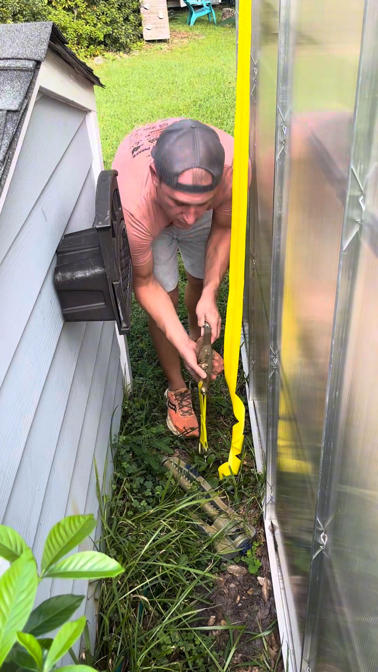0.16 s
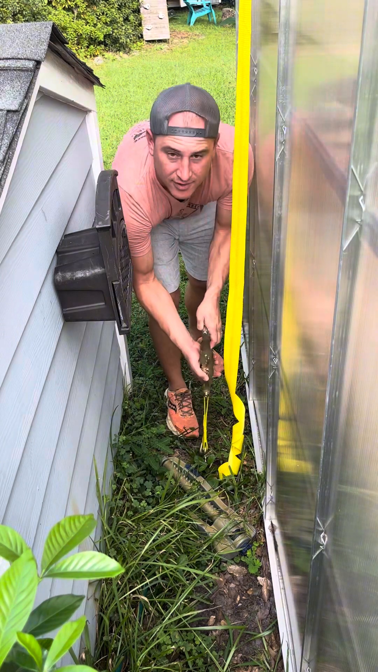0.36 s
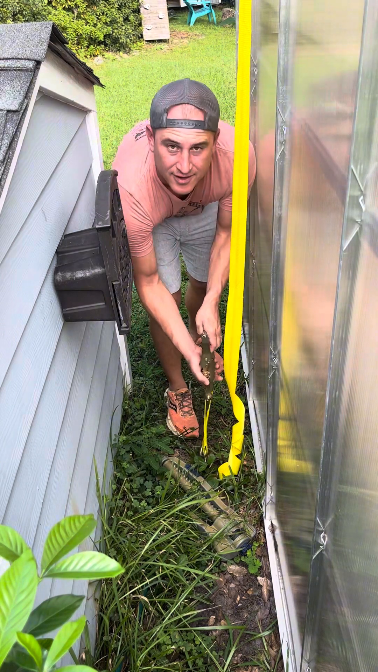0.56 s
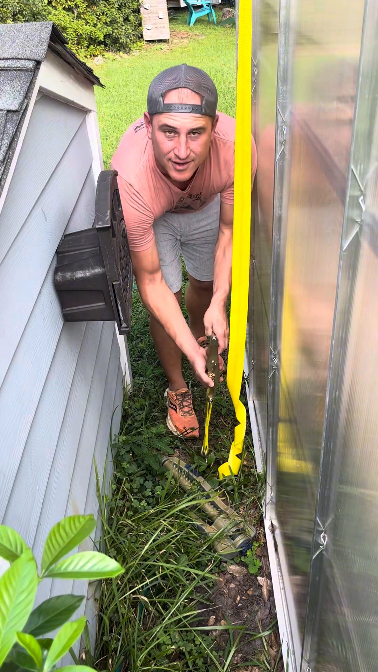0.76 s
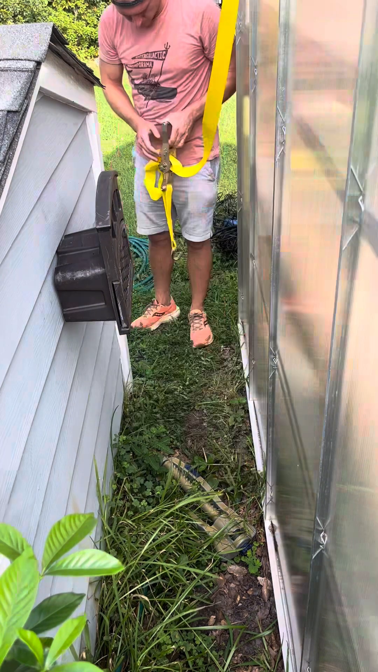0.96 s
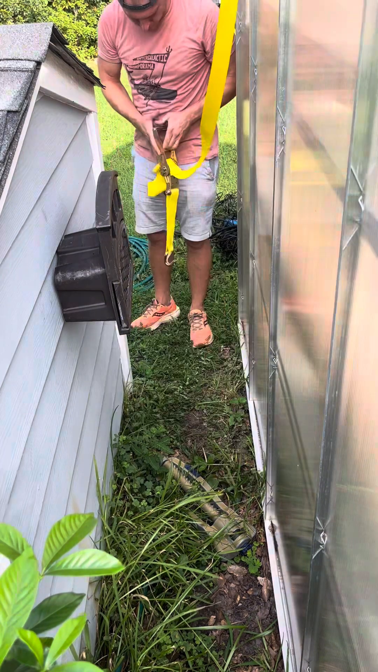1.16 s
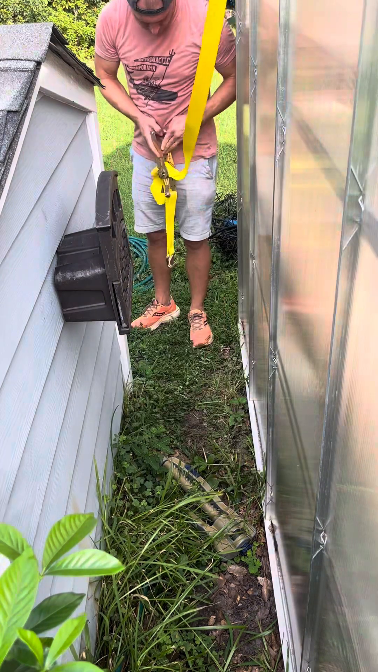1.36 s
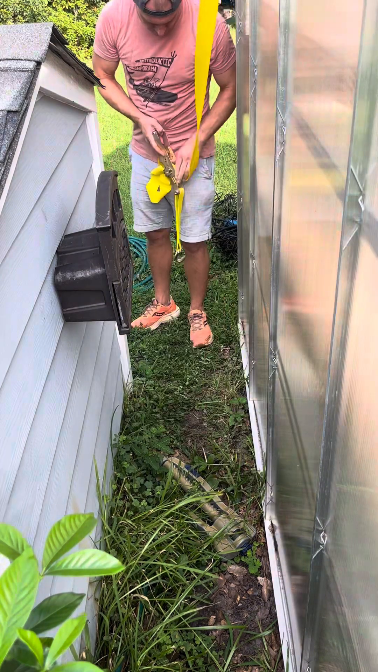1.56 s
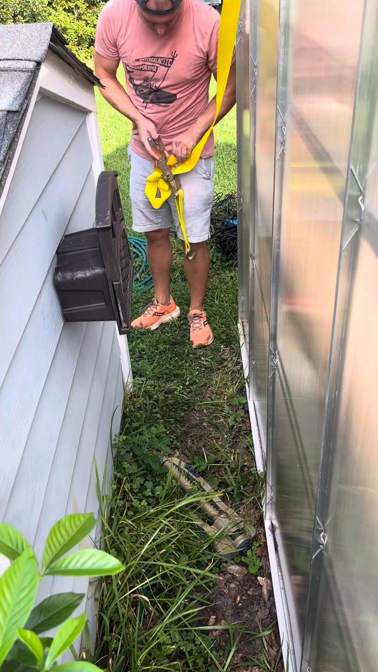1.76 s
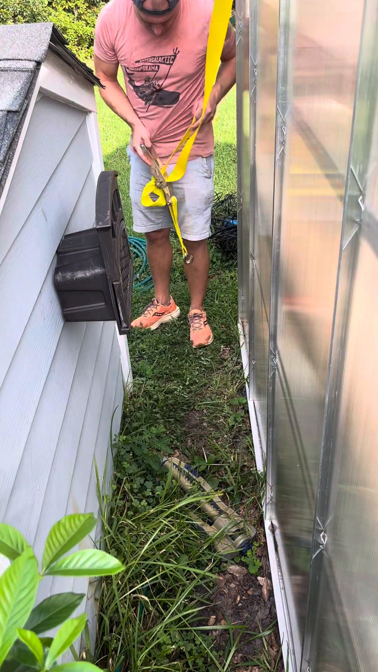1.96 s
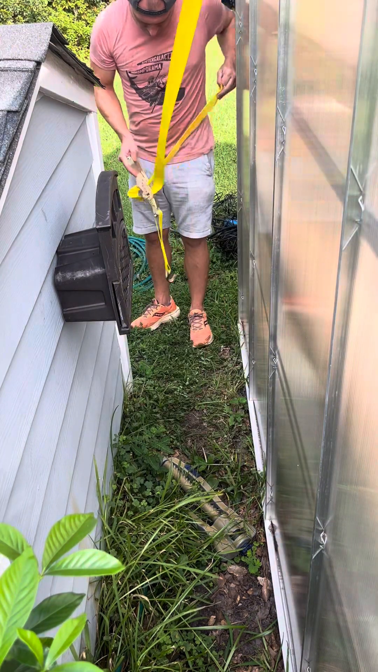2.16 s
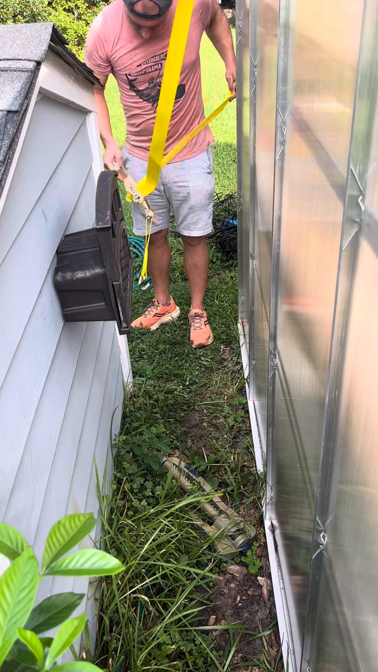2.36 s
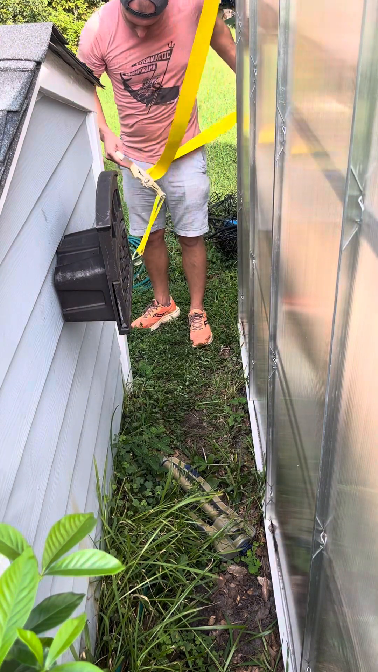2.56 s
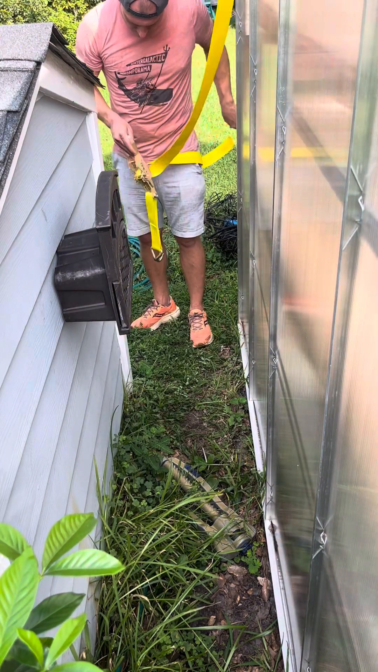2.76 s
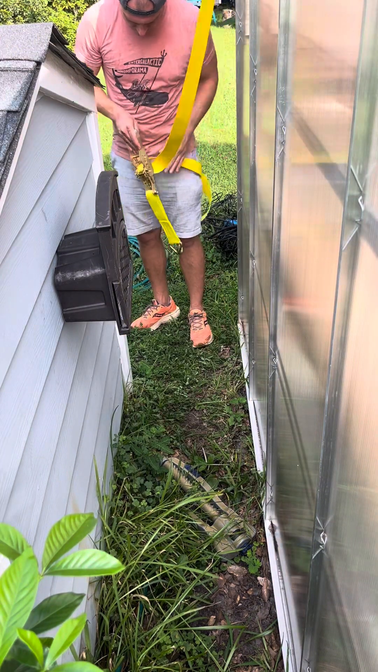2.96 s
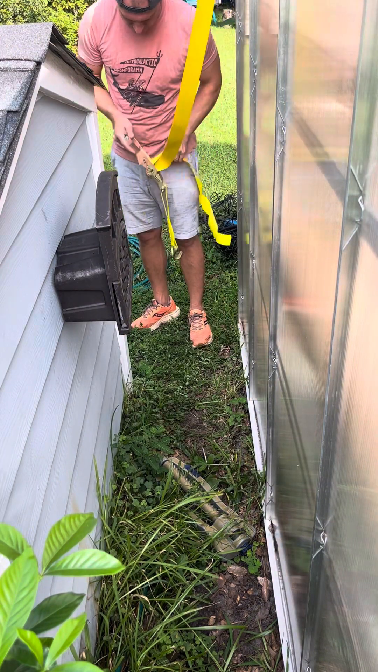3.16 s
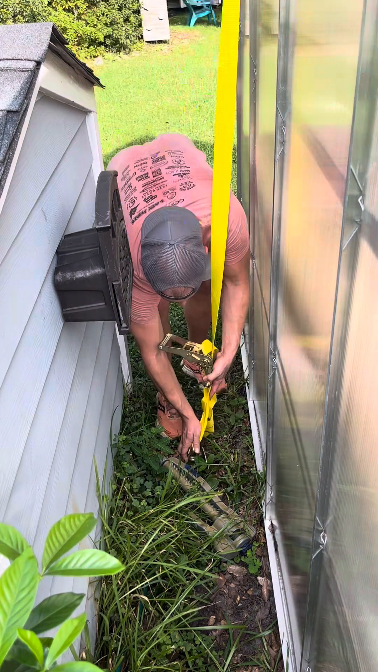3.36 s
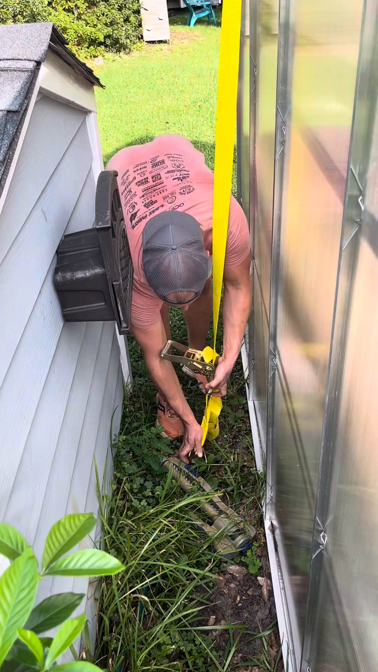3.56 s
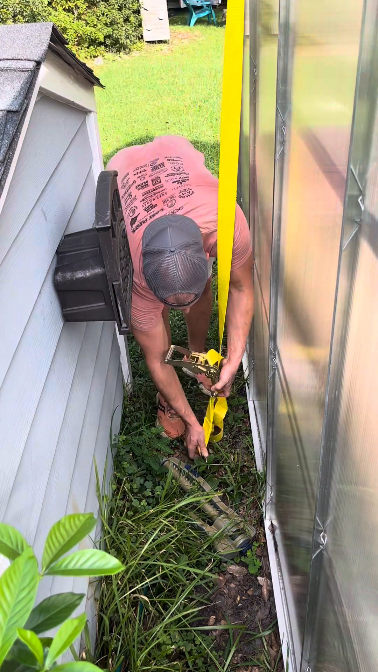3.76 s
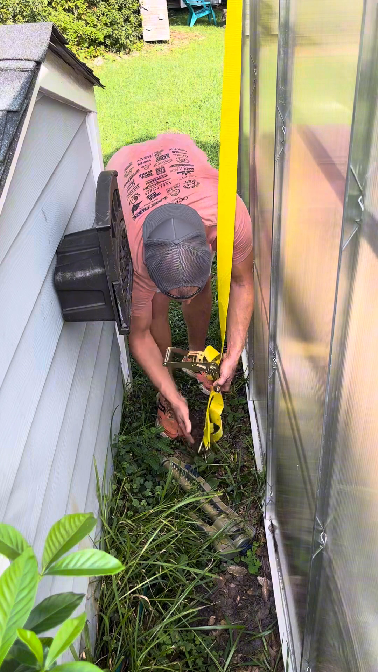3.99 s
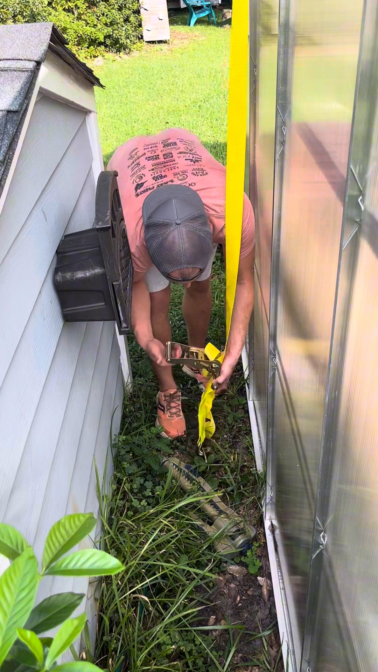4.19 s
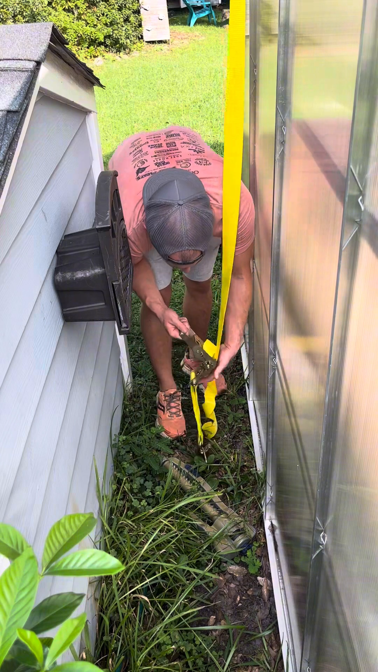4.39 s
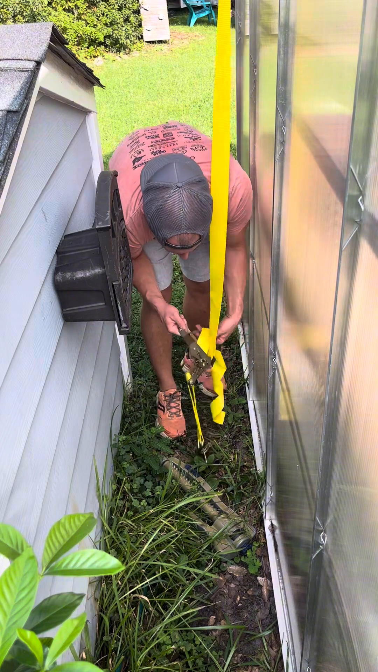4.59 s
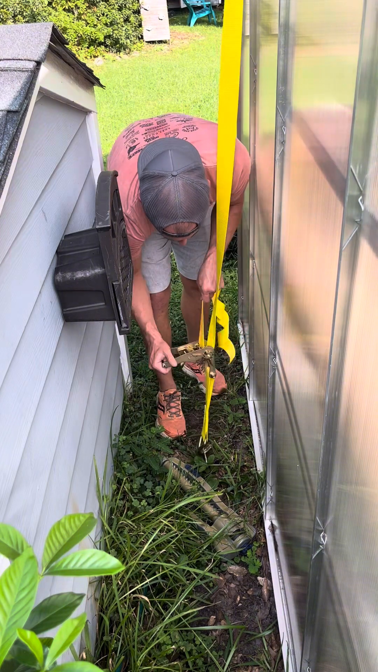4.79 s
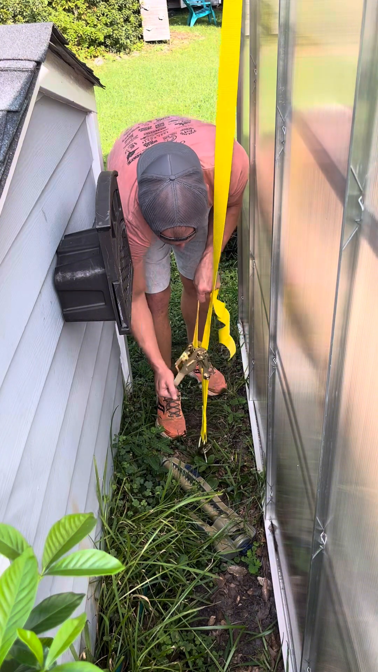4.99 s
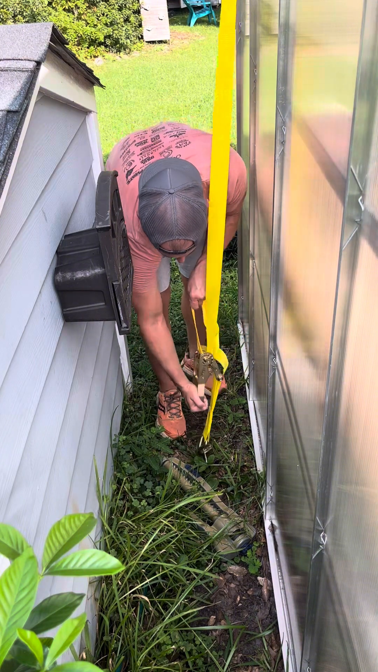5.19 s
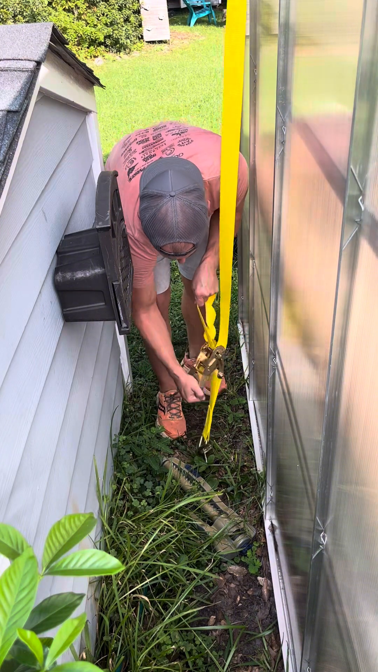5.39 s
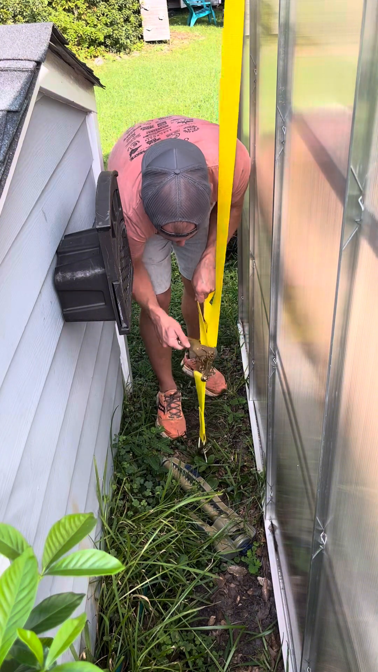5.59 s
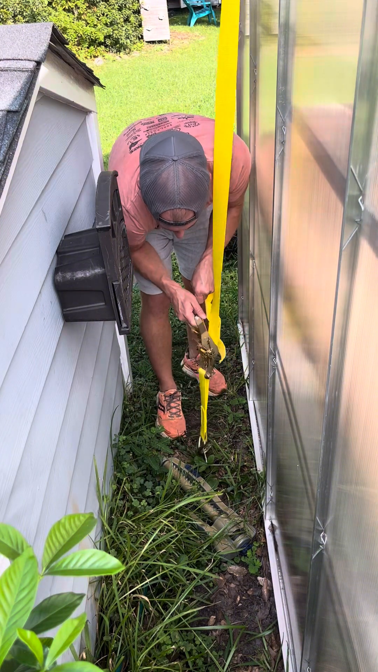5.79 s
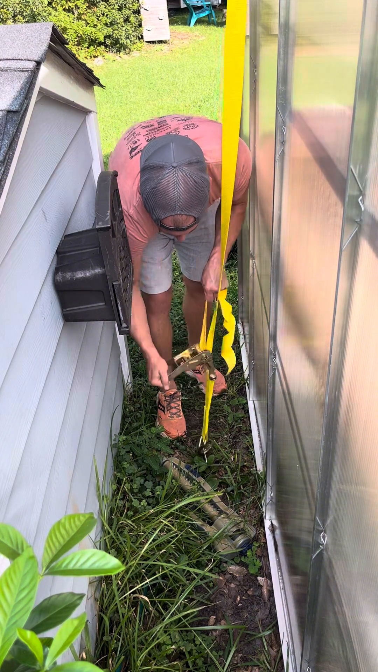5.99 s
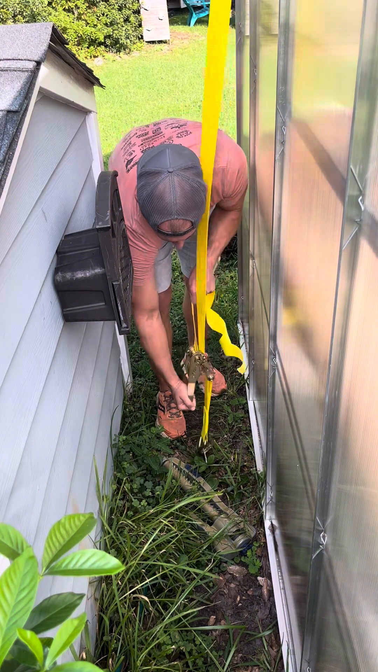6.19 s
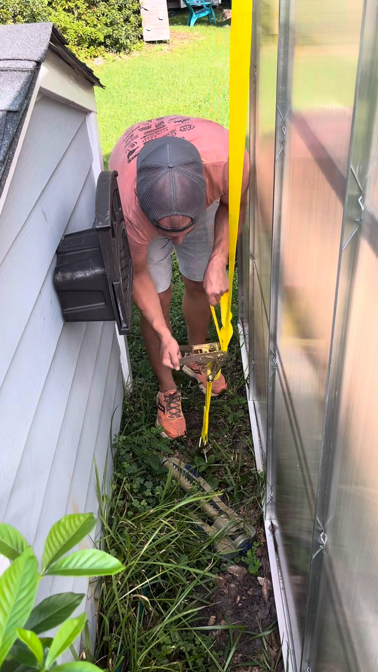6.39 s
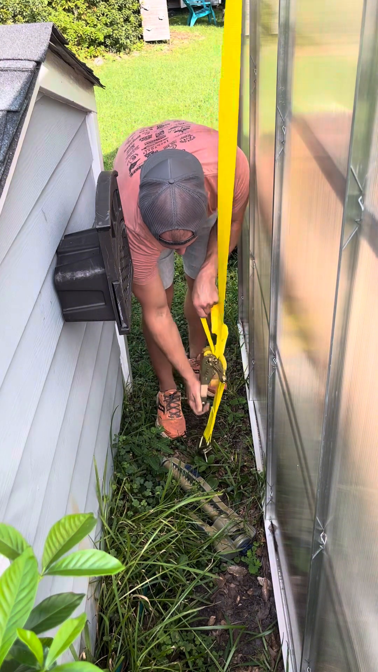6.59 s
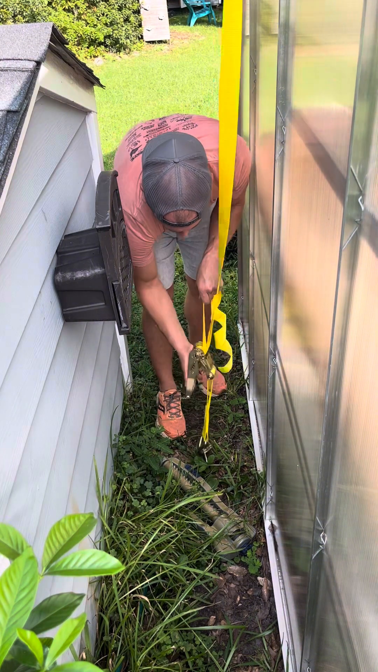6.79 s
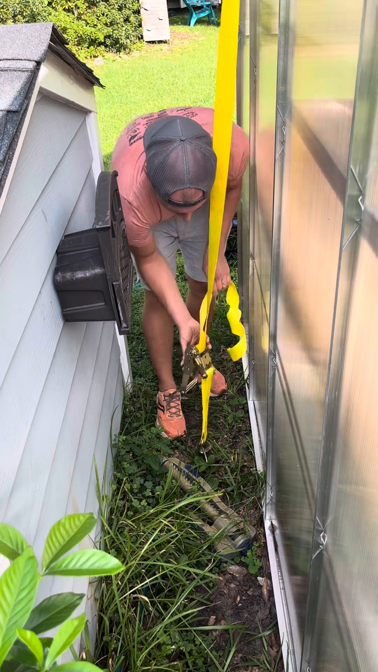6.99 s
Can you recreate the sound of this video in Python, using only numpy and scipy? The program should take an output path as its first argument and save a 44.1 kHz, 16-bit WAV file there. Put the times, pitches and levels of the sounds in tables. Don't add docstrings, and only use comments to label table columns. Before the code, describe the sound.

Outdoors in a tight passage, heard from about two metres. From 0 to 1 s a distant engine drones low, sinking in pitch and swelling, with a thin insect shimmer, small metal ticks and a clearer clink at 0.65; the engine stops dead at 0.98. A quiet bed remains: soft gusty rumble, distant traffic, faint high cricket trills and a barely audible hum. A sharp clink with a brush of webbing at 1.37, a dull rustling tap at 2.1, then near quiet. From 3.7 to 4.4 loose steel parts jingle brightly. Loud ratchet double clicks snap at 4.92 and 5.04, three rapidly at 5.53-5.66, three at 5.95-6.07, and two at 6.41 and 6.46, hard and bright with short rings and slap echoes. The last is abruptly cut; a faint falling squeak, rustle and small ticks at 6.8-6.95 close over low rumble.

```python
import sys
import numpy as np
from scipy import signal
from scipy.fft import rfft, irfft, next_fast_len
from scipy.io import wavfile
from scipy.ndimage import uniform_filter1d

SR = 44100
rng = np.random.default_rng(int(sys.argv[2]) if len(sys.argv) > 2 else 0)


def ratio_of_db(decibels):
    return 10 ** (np.asarray(decibels, float) / 20)


def wrap_up_sound(samples):
    columns = np.atleast_2d(samples).T
    tamed = np.clip(columns, -1, 1)
    steps = np.round(tamed * 32767).astype(np.int16)
    wavfile.write(sys.argv[1], SR, steps)


N = 310903
T = np.arange(N) / SR
FAST = next_fast_len(N)

CUTS_S = [
    .9825,
    4.766,
    6.4663,
]
# hz, density [dB per Hz]
AIR = [(25, -77), (40, -68), (60, -56.5), (100, -64), (150, -70), (250, -81), (500, -88), (800, -84),
       (1200, -89.5), (1800, -97), (3000, -103), (6000, -112), (10000, -117), (14000, -125)]


def set_rms(x, db):
    return x * ratio_of_db(db) / np.sqrt(np.mean(x ** 2))


def curves(table):
    s, *columns = np.transpose(table)
    return [np.interp(T, s, column) for column in columns]


def spectrum_db(table, hz):
    f, db = np.transpose(table)
    return np.interp(np.log(hz + 1), np.log(f), db)


def noise(table):
    hz = np.fft.rfftfreq(FAST, 1 / SR)
    white = rfft(rng.standard_normal(FAST))
    return irfft(white * ratio_of_db(spectrum_db(table, hz)), FAST)[:N] * np.sqrt(SR / 2)


def band(x, lo_hz, hi_hz):
    return signal.sosfilt(signal.butter(3, [lo_hz, hi_hz], "bandpass", fs=SR, output="sos"), x)


def walk(rate_hz):
    k = int(SR / rate_hz)
    held = np.repeat(rng.standard_normal(N // k + 1), k)
    return uniform_filter1d(uniform_filter1d(held, k), k)[:N]


def add(out, s, x):
    i = int(s * SR)
    end = min([int(c * SR) for c in CUTS_S if c > s] + [N, i + len(x)])
    out[i:end] += x[:end - i]


def engine():
    # start_s, firing_hz, level_db
    course = [(0.0, 81.5, -45), (0.046, 84.4, -52), (0.182, 80.3, -47), (0.234, 78.6, -43),
              (0.42, 76, -36.5), (0.774, 71.96, -34), (0.962, 72, -30), (0.98, 68.4, -30.5)]
    hz, firing_db = curves(course)
    phase = 2 * np.pi * np.cumsum(hz) / SR
    tone = np.zeros(N)
    for order, rel_db in [(1, 0), (1.5, -11.5), (2, -20.5)]:
        tone += np.sqrt(2) * ratio_of_db(firing_db + rel_db + 1.9 * walk(20)) * np.sin(order * phase)
    return tone * (T < CUTS_S[0])


def rumble():
    # start_s, gust_db
    gusts = [(1.0, -48), (1.64, -44.5), (1.79, -49.5), (2.28, -38), (2.43, -52.5), (2.53, -45.5),
             (4.69, -48.5), (4.72, -41.5), (4.76, -55), (5.09, -44), (5.5, -48), (5.7, -35.5),
             (5.97, -50.5), (6.07, -42), (7.0, -49.5), (7.05, -44.5)]
    # low_hz, high_hz, mean_db, share of gust followed [0-1], own_wander_db
    lows = [
        (20, 106, -45.5, 1.0, .5),
        (107, 187.6, -50.5, .35, 2.5),
        (200, 411, -56, 0.25, 1.5),
    ]
    gust_db = curves(gusts)[0]
    gust_db = gust_db - gust_db.mean()
    layers = []
    for lo_hz, hi_hz, db, share, wander_db in lows:
        layer = set_rms(band(noise(AIR), lo_hz, hi_hz), db)
        layers.append(layer * ratio_of_db(share * gust_db + wander_db * walk(8)))
    return sum(layers) - 0.32 * layers[0] * (T < CUTS_S[0])


def town_wash():
    wash = noise(AIR)
    out = band(wash, 200, 450) * ratio_of_db(-5.5)
    for hz in 450 * 2. ** np.arange(5):
        out += band(wash, hz, 2 * hz) * ratio_of_db(2.0 * walk(5.9))
    return out


def insects():
    early = T < CUTS_S[0]
    white = rng.standard_normal(N)
    out = early * (set_rms(band(white, 7100, 9230), -62.5) + set_rms(band(white, 8600, 8700), -67.5))
    out += ~early * set_rms(band(white, 7870, 8600), -71.5) * ratio_of_db(1.7 * walk(9.6))
    out += set_rms(band(white, 6750, 7400), -72) + set_rms(band(white, 4300, 5700), -75)
    return out


def cricket():
    phrases = [.17, .42, 0.718, 1.05, 1.38, 1.58, 1.8, 2.12, 2.33, 2.6, 2.83, 3.1, 3.43, 3.9, 4.43, 4.72,
               5.24, 5.55, 6.581, 6.95]
    gate = uniform_filter1d(sum(1. * (T > s) * (T < s + .14) for s in phrases), size=400)
    trill = 1 + .8 * np.sin(2 * np.pi * 46 * T)
    level_db = -68 - 3.1 * (T > CUTS_S[1]) + 2.0 * walk(1.9)
    phase = 2 * np.pi * np.cumsum(7170 + 25 * walk(37)) / SR
    return gate * trill * ratio_of_db(level_db) * np.sin(phase)


def fan():
    return ratio_of_db(-69 + 5.0 * walk(9)) * np.sin(2 * np.pi * 646 * T)


def rubbing():
    # start_s, length_s, level_db, centre_hz
    rubs = [(.19, 0.11, -62.5, 4640), (1.362, 0.013, -43, 8000), (2.068, 0.046, -50.5, 3100),
            (2.078, 0.071, -46.5, 600), (2.07, .22, -53, 380), (3.5, 1.1, -61, 480),
            (5.48, 0.049, -59.5, 9900), (6.61, 0.016, -57, 1880), (5.46, 0.097, -56, 3020),
            (5.88, 0.07, -49, 2400), (5.41, .06, -62, 11000), (5.47, .08, -62, 3400),
            (6.601, 0.23, -70, 6100), (1.58, .05, -64.5, 12500), (1.736, 0.23, -59, 2080),
            (1.6, 0.9, -65, 10800), (1.74, .2, -66, 11500), (1.8, .03, -60, 1900), (2.36, .08, -65, 12000),
            (5.56, .035, -50, 2500), (5.615, .035, -50, 2000), (2.05, .09, -66, 9000),
            (2.321, 0.14, -61, 7700), (3.32, .05, -71, 11000), (3.49, 0.25, -60.5, 9200),
            (4.53, 0.22, -62, 9620), (5.186, 0.066, -61.5, 10260), (5.698, 0.3, -57, 9200),
            (6.12, 0.38, -60, 8000), (6.47, .13, -59, 8050), (6.55, .46, -69, 9500),
            (6.844, 0.11, -62.5, 8050)]
    out = np.zeros(N)
    white = rng.standard_normal(N)
    grit = uniform_filter1d(rng.standard_normal(N), size=40) * np.sqrt(40)
    grain = white * ratio_of_db(1.3 * grit + 3.0 * walk(22))
    for s, length_s, db, hz in rubs:
        k = int(length_s * SR)
        stroke = band(grain[int(s * SR):][:k], hz / 4.8, min(hz * 1.4, 14500))
        add(out, s, set_rms(stroke, db) * signal.windows.tukey(k, .8))
    return out


def far():
    street = (town_wash() + insects()) * ratio_of_db(-2.5 * (T > CUTS_S[2]))
    return street + rubbing()


def struck():
    # start_s, mode_hz, level_db, t60_s
    frame_rings = [(4.22, 3618, -43.5, .07), (4.22, 7460, -59, .22), (4.934, 7487, -27, .3),
                   (5.662, 2342, -36.5, 0.19), (5.662, 11650, -23, 0.13), (5.876, 11600, -45, .1),
                   (5.895, 7450, -44, .1), (6.016, 11700, -22, .05), (6.078, 3655, -22, 0.096),
                   (6.078, 7537, -28, 0.12), (6.078, 9470, -26, .07), (4.934, 15700, -46, .25),
                   (6.078, 15700, -30, .07), (5.045, 15500, -32, .04), (5.662, 5250, -24, .05),
                   (5.601, 7200, -20, .03), (6.355, 3410, -54, .25), (6.785, 3630, -57, .17),
                   (6.868, 6260, -54, .1), (6.868, 3300, -60, .08)]
    # start_s, level_db, share of t60 [ratio], tilt [dB per octave]
    handle = [(2956, 1, .16), (5720, 0, .24)]
    handle_struck = [(.495, -50, 1.9, 3), (.584, -55, 1.1, -4), (3.71, -28, .33, 7), (3.802, -35, .6, 14),
                     (3.994, -61, .8, -19), (4.118, -62, .6, -12)]
    lever = [(3140, 1.5, 0.19), (11070, 3.5, 0.22)]
    lever_struck = [(.495, -46, 1.1, 4), (3.71, -42, .45, 10), (3.802, -44, .75, 4.5), (3.892, -64, 1.6, 4),
                    (3.994, -46.5, .9, -4.5), (4.118, -56, 1.1, 4), (4.285, -59, 0.98, -2)]
    spindle = [(2440, -2.5, 0.43), (5600, 3, 0.48), (12400, 0.5, .55)]
    spindle_struck = [(.657, -44, 0.091, 6), (3.71, -48, 0.094, -6), (3.994, -53, 1.3, 2),
                      (4.118, -50, .7, 3)]
    hook = [(6310, 4, 0.15), (6870, -2, .18), (10630, 1, 0.15)]
    hook_struck = [(.495, -66, 1.8, 14), (.584, -47, 1.1, -12), (.657, -38, .3, 11), (3.71, -28, .45, -14),
                   (3.802, -34, .6, -10), (3.994, -37, 2.1, .1), (4.118, -51, 1.1, -6),
                   (4.285, -47, .7, -8), (4.398, -44, .75, 5), (6.94, -50, .6, -1)]
    clasp = [(2261, 0, .12), (9270, 0, .2)]
    clasp_struck = [(.495, -48, 1.5, 9), (.584, -60, .8, 5), (.657, -42, .5, -5), (3.994, -49, 1.6, 9),
                    (4.118, -58, 1.2, 6), (4.398, -38, 1.05, 2.2), (6.94, -57, 1.1, -2)]
    parts = [(handle, handle_struck), (lever, lever_struck), (spindle, spindle_struck),
             (hook, hook_struck), (clasp, clasp_struck)]
    out = list(frame_rings)
    for modes, strikes in parts:
        for s, db, share, tilt_db in strikes:
            for hz, mode_db, t60_s in modes:
                out.append((s, hz, db + mode_db + tilt_db * np.log2(hz / 6000), t60_s * share))
    return out


def rings():
    # start_s, peak_db, mode_hz, t60_s
    knocks = [(.655, -31.5, 3370, 0.033), (1.368, -38, 1200, 0.029), (1.369, -34.5, 2780, 0.023),
              (1.368, -37, 4700, .025), (0.661, -39.5, 450, 0.061), (2.086, -33, 310, 0.07),
              (4.401, -47, 438, 0.14), (5.6, -45.5, 263, 0.065), (5.659, -48.5, 249.5, .05),
              (5.707, -34.5, 58, 0.26), (6.082, -40.5, 239, 0.13), (6.613, -52, 1720, .04),
              (.658, -39, 1900, .035), (.42, -47, 1500, .03), (3.993, -44, 1100, .03),
              (4.219, -46, 1000, .03), (4.398, -48, 1000, .03), (2.086, -49, 1100, .04),
              (1.372, -42, 2000, .025), (1.895, -56, 2000, .04)]
    ring_stops = [4.992]
    out, t = np.zeros(N), np.arange(SR // 4) / SR
    modes = struck()
    blows = np.array([row[0] for row in modes] + list(ring_stops) + [N / SR])
    for s, hz, db, t60_s in modes + [(s, hz, db, t60_s) for s, db, hz, t60_s in knocks]:
        free_s = blows[blows > s].min() - s
        fall_db = -60 * t / t60_s - 60 * np.maximum(t - free_s, 0) / .03
        beat_hz = 20 + 30 * rng.random()
        beat = 1 + .3 * np.sin(2 * np.pi * (beat_hz * t + .1))
        attack = 1 - np.exp(-t / 0.00054)
        add(out, s, ratio_of_db(db + fall_db) * beat * attack * np.sin(2 * np.pi * hz * t))
    return out


def hits():
    # start_s, drop_db, delay_ms, seat_db, seat_mode_hz
    snaps = [(4.9225, -11, 3.3, -8, 9200), (5.0436, -7, 4.8, -16.5, 5270), (5.533, -10, 5.6, -5, 6820),
             (5.5965, -14, 4.4, -9, 13100), (5.655, -11, 4.4, -4.5, 6900), (5.9503, -17, 4.3, -4, 6800),
             (6.007, -18, 5.4, -6.5, 12200), (6.068, -15, 6.8, -5, 9460), (6.4075, -15, 7.6, -9.5, 7700),
             (6.461, -19, 2.9, -9, 6980)]
    # lows_db, highs_db
    grips = [(-2, .5), (-3, 1.5), (-7, -3.5), (-2.5, .7), (-2.5, .7), (.7, 1.5), (3, 1.5), (3, .7),
             (-1.5, 1.5), (-5, -6)]
    # start_s, peak_db, chatter_t60_ms, loudest_mode_hz (and lows_db except taps)
    slips = [(4.9115, -18.5, 30, 5230, -12), (4.917, -27, 32, 2000, -12), (4.9405, -24, 25, 7500, -14),
             (5.0405, -20, 32, 7900, -11), (5.5415, -9, 15, 7150, -18), (5.59, -29, 32, 6840, -14),
             (5.5935, -21, 32, 7200, -16), (5.603, -16, 24, 6970, -16), (5.653, -20, 20, 7180, -14),
             (6.4112, -12, 32, 7500, -17), (6.4195, -18, 18, 5600, -12), (6.0185, -20, 32, 9200, -12),
             (6.0305, -32, 20, 8000, -10), (6.0785, -10, 30, 12000, -19), (6.4269, -25, 32, 6450, -11),
             (5.9625, -24, 45, 9200, -11)]
    clinks = [(0.4947, -37.5, 19, 10800, -12), (0.6541, -22, 16, 5300, -10),
              (0.9827, -37.5, 3.5, 1515, -12), (1.3677, -24.5, 14, 9000, -8), (2.11, -50, 22, 9000, -10),
              (3.702, -35.5, 28, 6800, -12), (3.7073, -24.5, 16, 9000, -16), (3.794, -30, 45, 6300, -15),
              (3.8002, -20.5, 12, 6900, -24), (3.8923, -53, 25, 5610, -12), (3.9923, -31, 7.3, 10400, -9),
              (4.0263, -43, 25, 6800, -12), (4.117, -41, 42, 5840, -9), (4.2043, -36, 40, 4600, -12),
              (4.218, -29.5, 42, 4850, -12), (4.3955, -36.5, 68, 9310, -8), (5.438, -38, 45, 4600, -9),
              (5.4494, -36, 45, 5200, -8), (5.7582, -43, 17, 13100, -12), (5.8736, -30, 55, 9000, -4),
              (6.3158, -28, 27, 9400, -11), (6.7815, -43, 36, 4800, -5), (6.787, -43.5, 32, 5240, -8),
              (6.939, -45, 26, 4600, -8)]
    taps = [(0.4192, -43, 24, 4200), (0.937, -51, 20, 1700), (0.5859, -48, 22, 5000),
            (2.0834, -43, 55, 3300), (4.285, -49, 54, 6220), (4.8979, -41.5, 60, 1830),
            (5.024, -46.5, 17, 4300), (5.028, -44.5, 37, 2250), (5.9415, -35, 30, 2010),
            (6.3216, -35.5, 65, 2650), (6.3702, -52, 38, 3390), (6.389, -52, 64, 3000)]
    out = []
    for (s, drop_db, delay_ms, seat_db, seat_hz), grip in zip(snaps, grips):
        out.append((s, drop_db, 30, 7200, *np.add((-10, -5), grip)))
        seat_t60_ms = 27 - 1.6 * (seat_db + 8)
        out.append((s + delay_ms / 1000, seat_db, seat_t60_ms, seat_hz, *np.add((-16.5, -4.5), grip)))
    out += [(*row, -9) for row in clinks]
    out += [(*row, -2.5, -21) for row in taps]
    return out + [(*row, -7) for row in slips]


def contacts(size=8192):
    # hz, level_db
    steel = [(500, -27.5), (1000, -15.5), (2000, -3), (3500, -2), (4300, -1), (5500, 1), (7200, 0.5),
             (8500, -1.5), (12000, 3), (14400, -3.5), (15800, -9), (16400, -46.5)]
    frame_hz = [1050, 1400, 1800, 2250, 2950, 3650, 5240, 5650, 6200, 6890, 7200, 7490, 8250, 9300, 10550,
                11600, 12200, 12750, 13800, 15700]
    near, echo = np.zeros(N), np.zeros(N)
    t, hz = np.arange(size) / SR, np.fft.rfftfreq(size, 1 / SR)
    count = len(frame_hz)
    for s, db, t60_ms, top_hz, low_db, high_db in hits():
        chance = rng.standard_normal((5, size))
        fall = (1 - np.exp(-t / 0.00037)) * ratio_of_db(-60 * (t / (0.00053 * t60_ms)) ** 1.64)
        chatter = chance[0] * ratio_of_db(3.5 * chance[1]) * fall
        mode_hz = np.append(np.array(frame_hz) * (1 + 0.031 * chance[2, :count]), top_hz)
        gain = np.append(ratio_of_db(2.5 * chance[3, :count]), ratio_of_db(11))
        width_hz = 280 + 0.017 * mode_hz
        modes = (gain * width_hz / (width_hz + 2j * (hz[:, None] - mode_hz))).sum(axis=1) + 1.32
        tilt = [(2000, low_db + 10.0), (4500, 0.012), (8500, 0.011), (11000, high_db + 2.5)]
        colour_db = spectrum_db(steel, hz) + spectrum_db(tilt, hz)
        blow = irfft(rfft(chatter) * modes * ratio_of_db(colour_db), size)
        blow[-size // 8:] = 0
        blow *= ratio_of_db(db) / np.sqrt(uniform_filter1d(blow ** 2, size=30).max())
        decay = ratio_of_db(-32 - 60 * t / .058) + ratio_of_db(-52 - 60 * t / .4)
        walls = chance[4] * decay * (1 - np.exp(-t / .004))
        add(near, s, blow)
        add(echo, s, signal.fftconvolve(blow, walls)[:size])
    return near, band(echo, 200, 15000)


def squeaks():
    out, t = np.zeros(N), np.arange(SR // 4) / SR
    swell = np.sin(np.pi * np.clip(t / 0.15, 0, 1))
    for hz, db in [(2800, -60), (3200, -67)]:
        add(out, 6.495, ratio_of_db(db) * swell * np.sin(2 * np.pi * hz * t * (1 - 0.27 * t)))
    return out


def ports(shared, scattered, other):
    # hz, left_lead_rad, left_minus_right_db, likeness of far sound [0-1]
    port_table = [(0, 0, 0, 1), (200, -.15, -.8, .97), (400, -.6, -3.5, .8), (650, -.9, 4.5, .4),
                  (1030, -.1, 0, .4), (1700, .1, 0, .75), (2650, 2.1, -2, .5), (3400, 1.4, -4, .3),
                  (4300, .9, -3, .4), (4900, 1.1, -3, .65), (6000, 3.14, 0, .96), (8050, 6.28, 0, .99),
                  (10250, 9.42, 0, .99), (12500, 12.56, 0, .99), (14600, 15.7, 0, .99),
                  (16500, 18.5, 0, .9)]
    hz = np.fft.rfftfreq(FAST, 1 / SR)
    f, *columns = np.transpose(port_table)
    lead_rad, pan_db, like = (np.interp(hz, f, column) for column in columns)
    turn = ratio_of_db(pan_db / 2) * np.exp(1j * lead_rad / 2)
    same = rfft(shared, FAST) + np.sqrt((1 + like) / 2) * rfft(scattered, FAST)
    own = np.sqrt((1 - like) / 2) * rfft(other, FAST) * np.array([[1], [-1]])
    return irfft((same + own) * np.array([turn, 1 / turn]), FAST)[:, :N]


def scene():
    near, echo = contacts()
    late = np.roll(echo, 97)
    heard = (T < CUTS_S[2] + .0003) | (T > CUTS_S[2] + .05)
    steel = ports(near, echo, late) * heard
    direct = engine() + rumble() + cricket() + fan() + rings() + squeaks()
    return steel + ports(direct, far(), far())


def low_pass(x):
    return signal.sosfilt(signal.butter(12, 16280, fs=SR, output="sos"), x)


def record(dry):
    mute = sum(depth * np.exp(-((T - s - .0055) / .005) ** 6) for s, depth in zip(CUTS_S[1:], [.7, .98]))
    treble = signal.sosfiltfilt(signal.butter(2, 900, "highpass", fs=SR, output="sos"), dry)
    x = np.tanh(1.2 * (dry - mute * treble)) / 1.2
    mix = signal.sosfilt(signal.ellip(8, .2, 70, 16150, fs=SR, output="sos"), x)
    return low_pass(mix)


dry = scene()
out = record(dry)
wrap_up_sound(out)
```